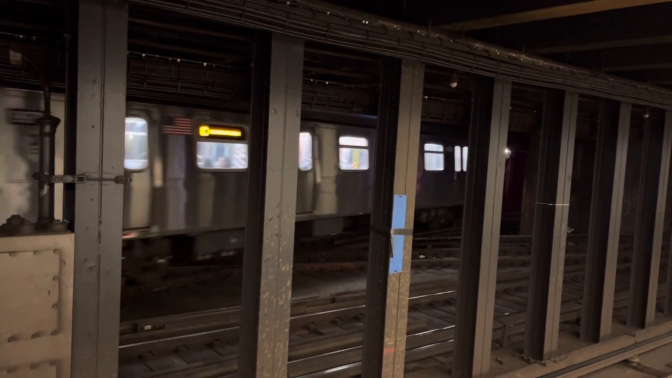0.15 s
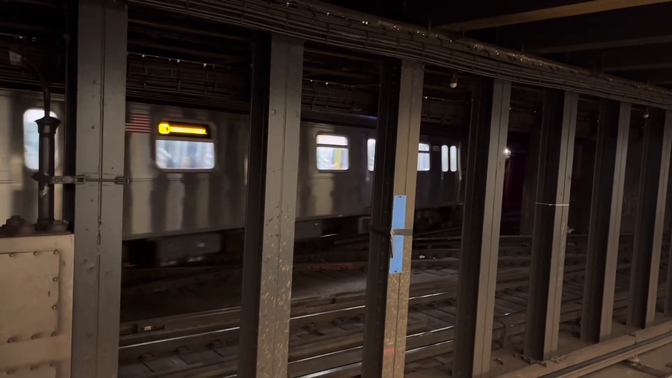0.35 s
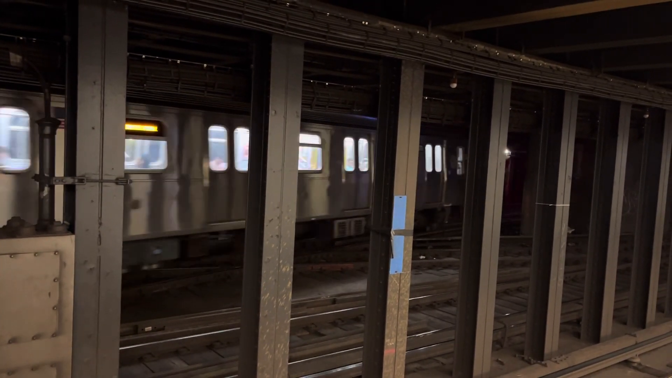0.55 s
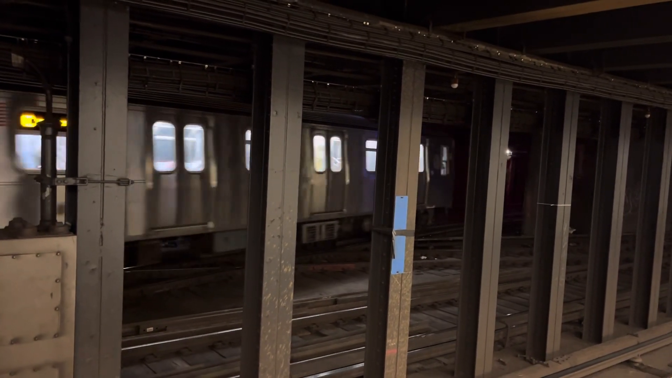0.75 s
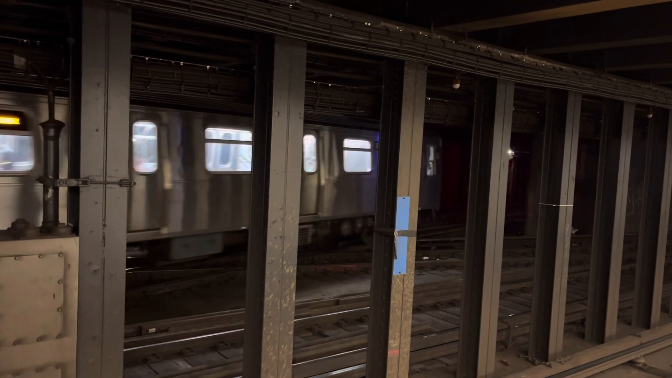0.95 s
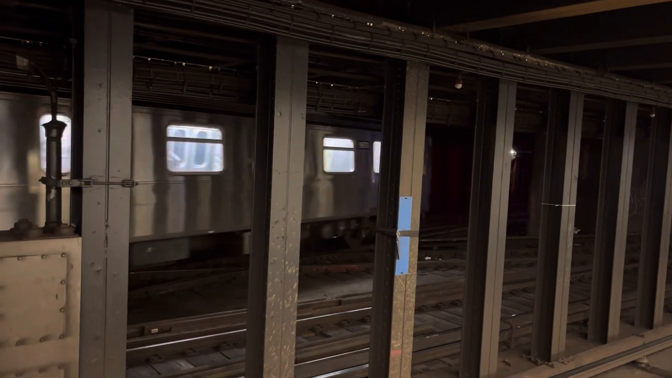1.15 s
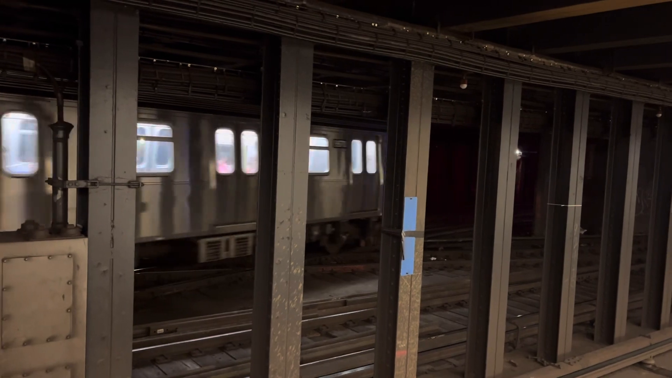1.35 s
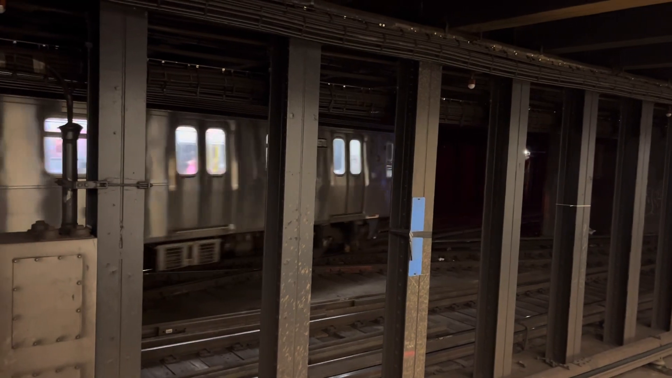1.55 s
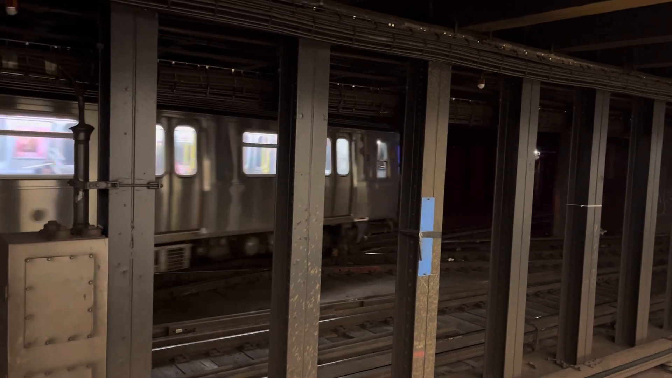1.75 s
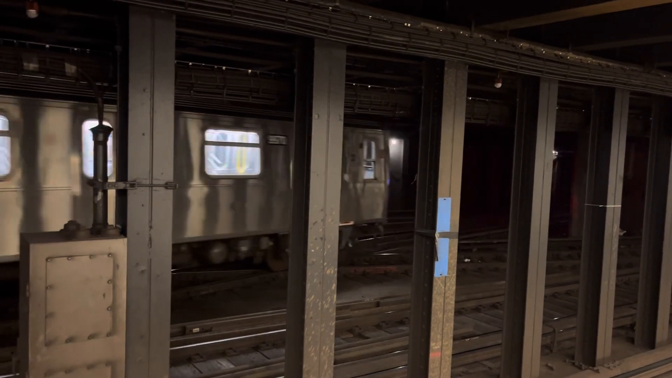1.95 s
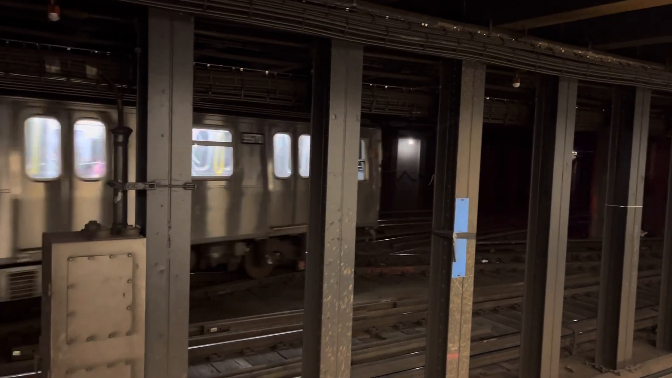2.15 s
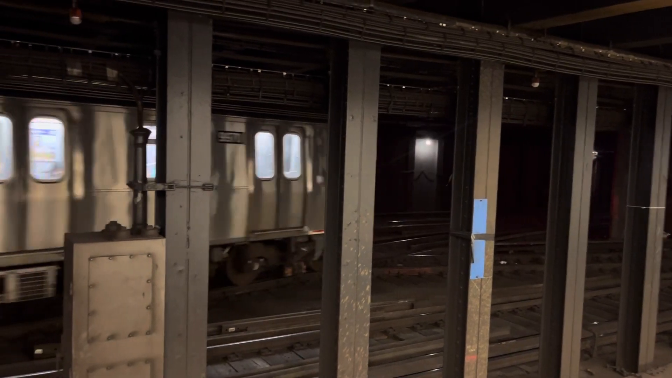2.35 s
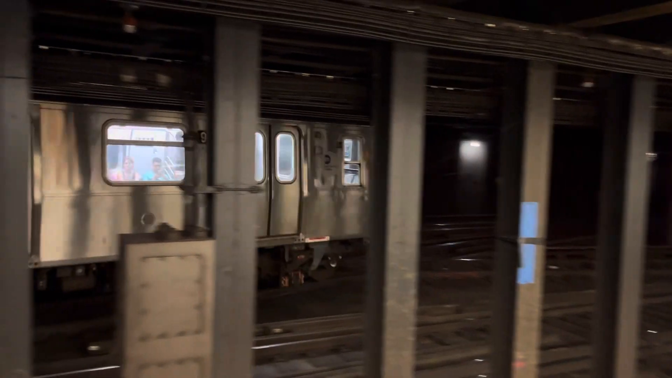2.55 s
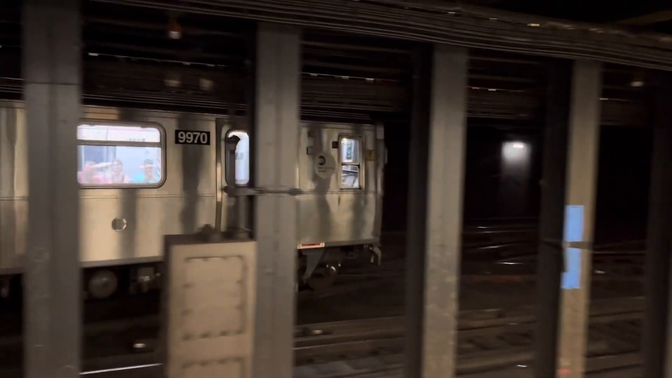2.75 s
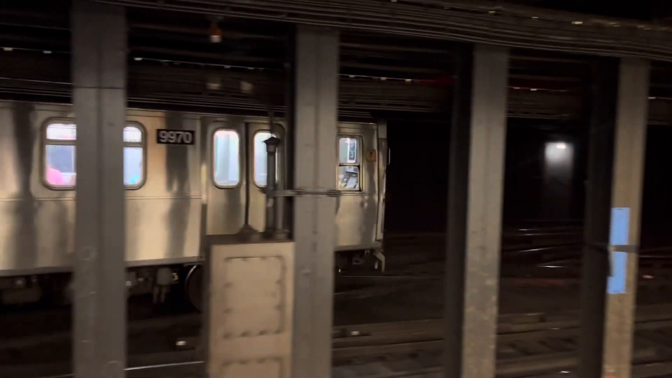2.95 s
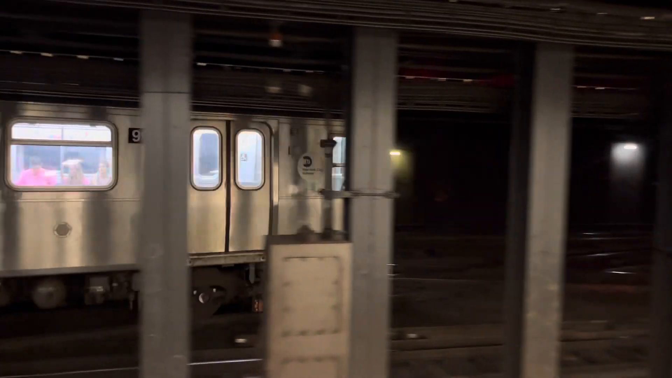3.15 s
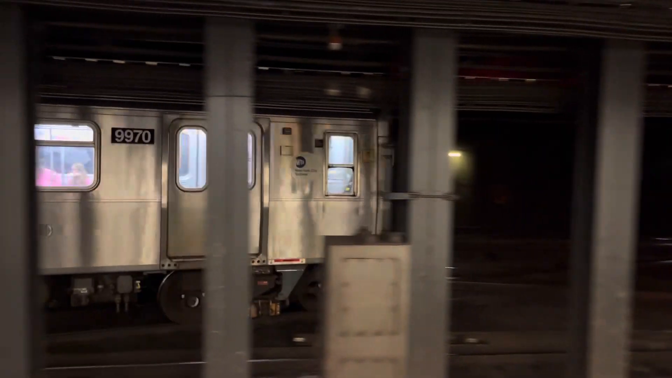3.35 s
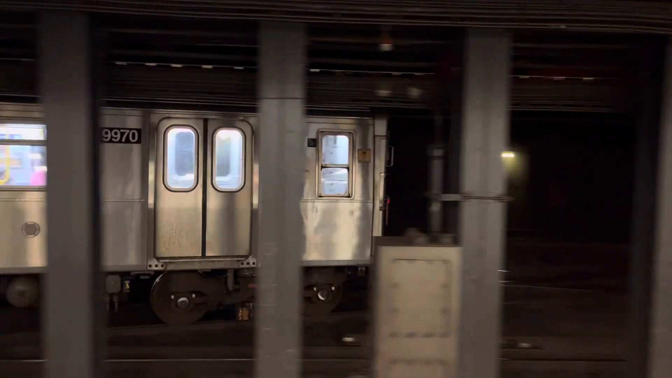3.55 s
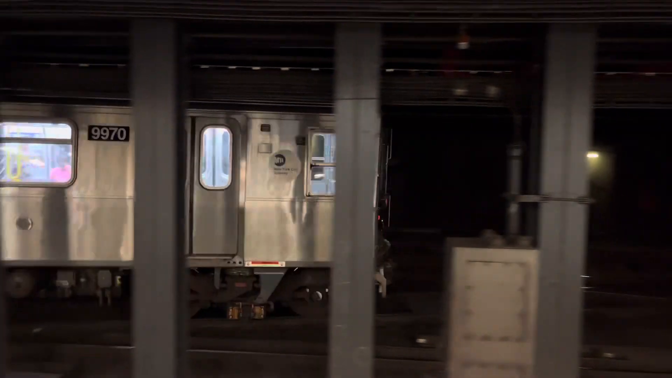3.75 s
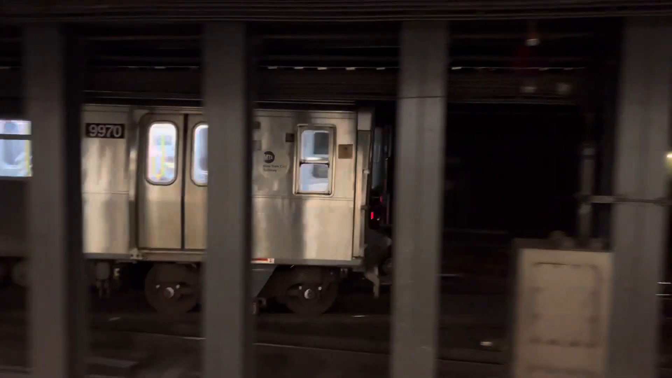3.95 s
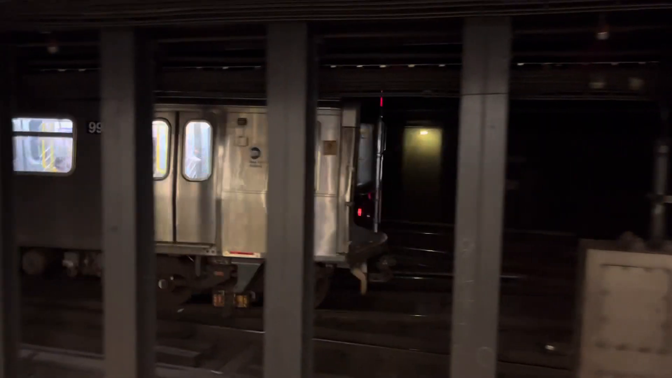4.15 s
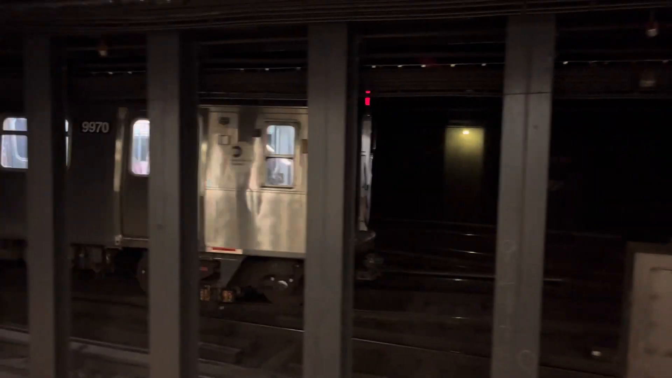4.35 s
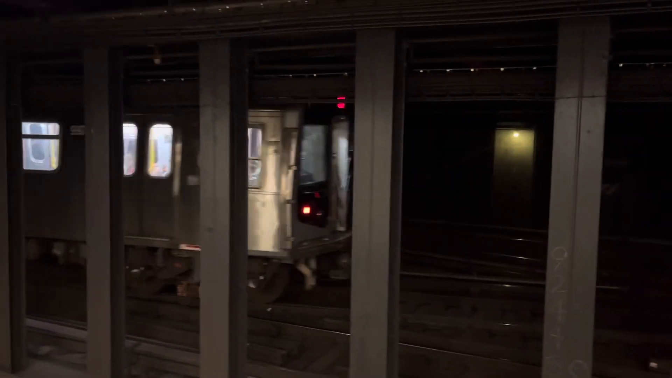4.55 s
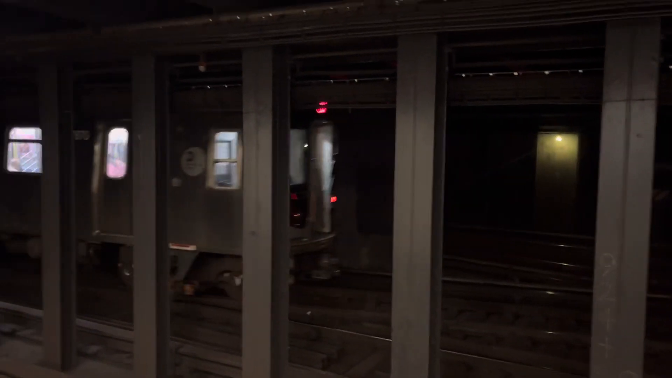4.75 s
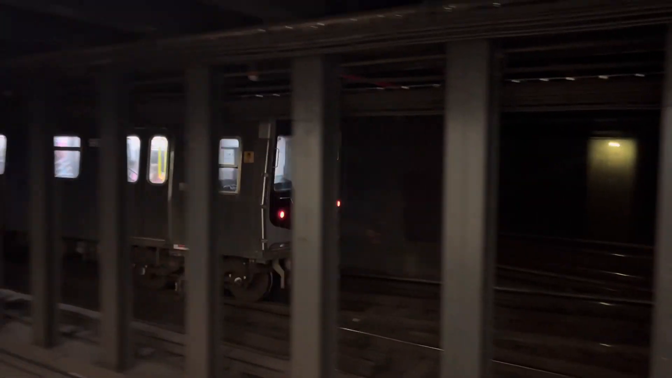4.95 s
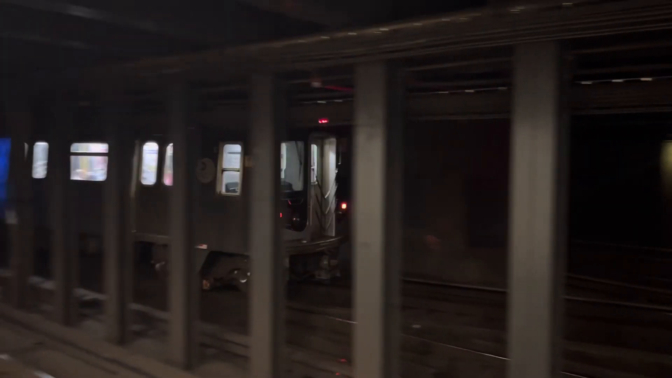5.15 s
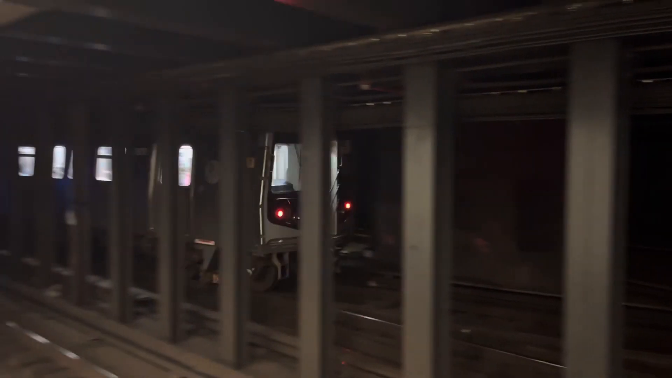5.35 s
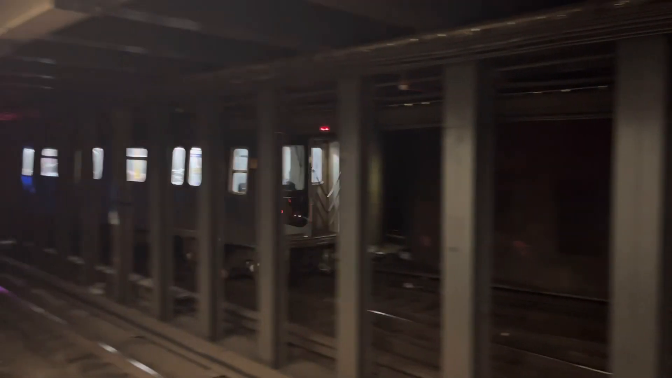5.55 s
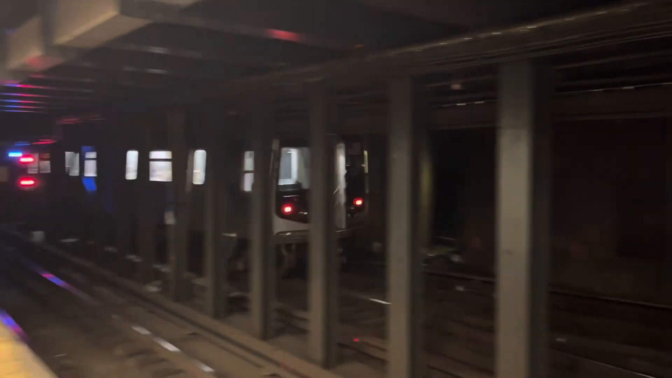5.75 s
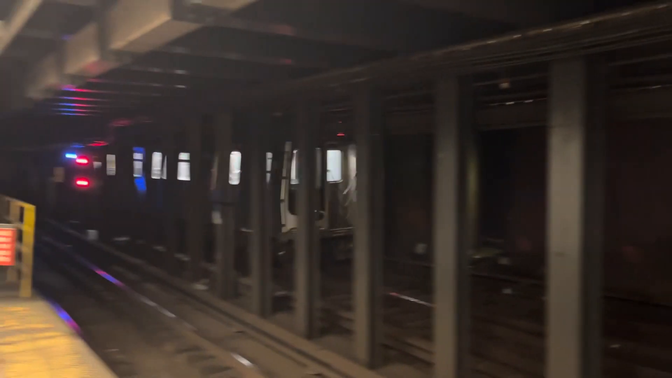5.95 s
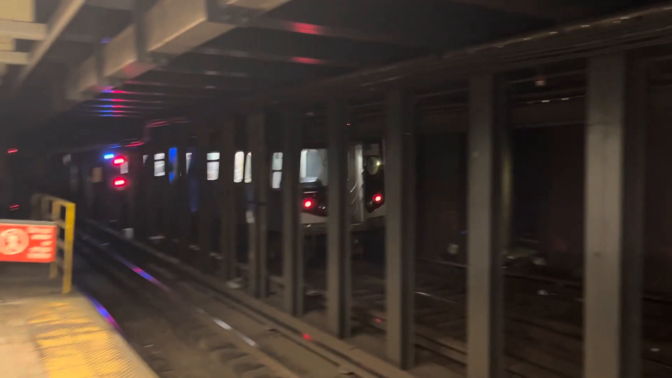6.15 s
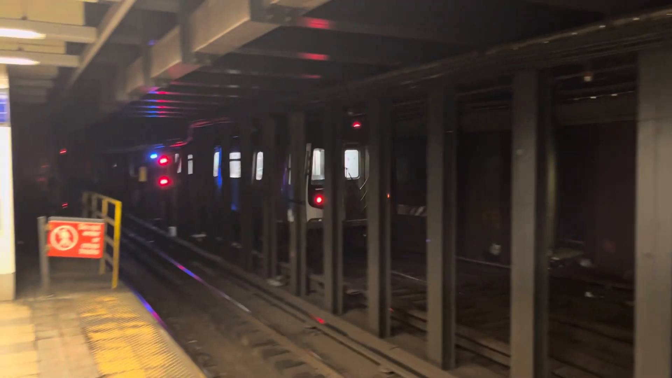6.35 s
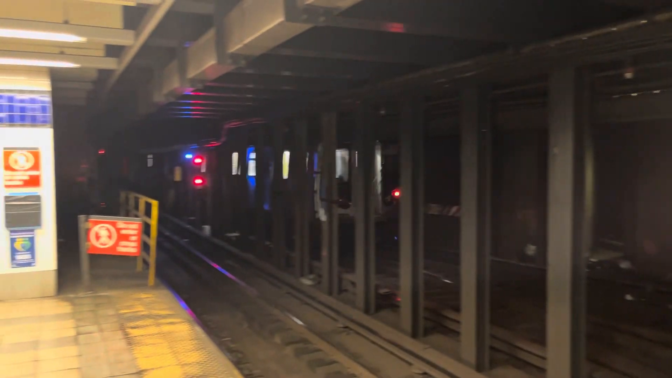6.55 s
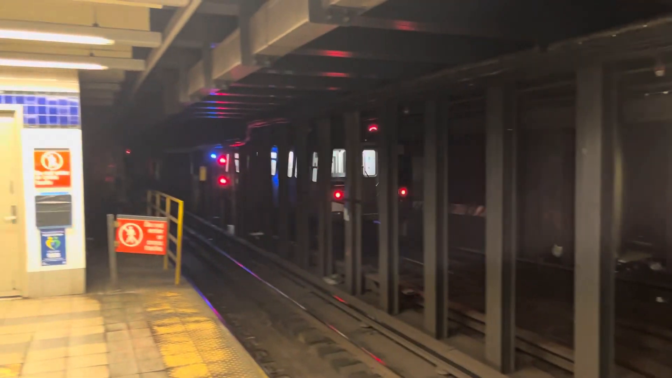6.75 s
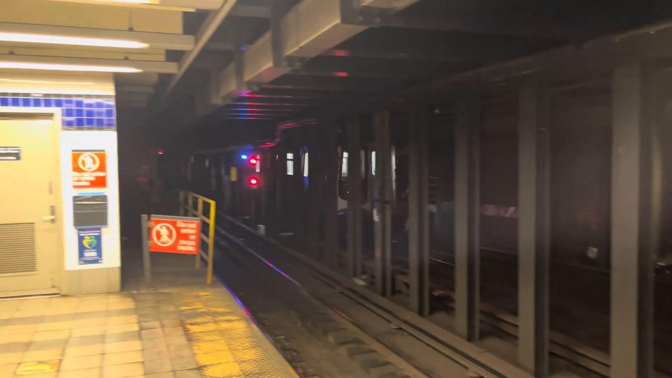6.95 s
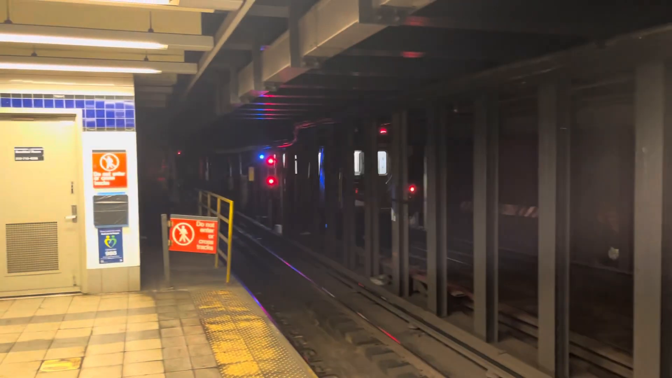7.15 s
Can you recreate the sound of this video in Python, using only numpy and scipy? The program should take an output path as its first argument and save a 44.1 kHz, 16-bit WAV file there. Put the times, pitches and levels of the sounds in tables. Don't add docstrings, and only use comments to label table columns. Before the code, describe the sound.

A subway train is already rolling by at close range in a reverberant, low concrete station, heard through a phone's two microphones. From 0 to 1.3 s, irregular steel clacks and low thuds hit rail joints every fifth of a second or so, over ground rumble, hollow car roar and rough rail hiss. A strong bang lands at 1.4 s, the heaviest at 1.9 s, with more at 2.3-2.4 s and 2.8 s; the car body booms, rims ring brightly and flanges squeal thinly. The roar swells around 2-2.5 s, with unsteady motor hum and a faint high fan whistle. After a thinner stretch near 3.3 s, smaller clacks cluster at 3.6-4.2 s with piercing short squeals. Then the blows spread out and weaken, apart from a firmer clack near 6.45 s, leaving fading roar, hiss and tunnel echo until about 7.2 s.

```python
import sys
import numpy as np
from scipy import signal
from scipy.fft import rfft, irfft, next_fast_len
from scipy.io import wavfile
from scipy.ndimage import uniform_filter1d

SR = 44100
rng = np.random.default_rng(int(sys.argv[2]) if len(sys.argv) > 2 else 0)


def convert_level_to_amplitude(level_db):
    exponent = np.asarray(level_db, float) / 20
    return 10 ** exponent


def generate_wav(sig):
    pcm = np.round(np.clip(np.atleast_2d(sig).T, -1, 1) * 32767).astype(np.int16)
    wavfile.write(sys.argv[1], SR, pcm)


N = 317961

# start_s, level_db, lean_db
MOTOR_HUM = [(0, -48, 5), (.5, -38, 3.5), (1.1, -35.5, -5), (1.8, -43, 10), (2.4, -26, -25), (2.8, -48, 11),
             (3.2, -33, -3), (4.3, -33, -15), (4.6, -41, 4.5), (5.8, -53, 16.5), (6.15, -40, -5),
             (6.3, -43.5, 10.5), (6.6, -44, -1), (6.9, -42, 6.5), (7.21, -37, 1.5)]
# start_s, pitch_hz, level_db
FAN_WHISTLE = [(0.0, 2860, -43), (0.74, 2852, -45.5), (1.951, 2820, -43.5), (2.45, 2770, -43),
               (2.65, 2800, -49), (3.0, 2846, -46), (5.02, 2825, -47.5), (5.8, 2817, -45.5),
               (7.21, 2830, -48.5)]
# full_swell_s, fade_s, pitch_hz, level_db
RIM_RINGS = [(0.25, 0.2, 7950, -53), (0.33, 0.1, 7320, -50), (0.32, 0.05, 7190, -50),
             (0.61, 0.12, 8940, -50), (1.01, 0.05, 5020, -52), (1.55, 0.06, 8940, -49),
             (2.01, 0.05, 8940, -41), (2.05, 0.08, 5710, -40), (2.26, 0.05, 7900, -54),
             (2.39, 0.1, 11520, -52), (2.4, 0.05, 5710, -40), (2.44, 0.29, 7920, -45),
             (2.49, 0.13, 4010, -38), (2.51, 0.08, 10030, -55), (2.91, 0.16, 7920, -51),
             (2.98, 0.08, 5680, -46), (3.65, 0.05, 6010, -53), (4.5, 0.1, 8960, -54),
             (3.91, 0.16, 9370, -44), (3.92, 0.05, 6180, -44), (3.88, 0.05, 5210, -51),
             (3.91, 0.08, 6760, -53), (3.93, 0.08, 10900, -56), (3.93, 0.14, 8230, -55),
             (4.16, 0.15, 8940, -45), (4.18, 0.15, 12340, -56), (4.19, 0.21, 7710, -44),
             (4.19, 0.05, 9110, -52), (4.56, 0.1, 6030, -53), (6.49, 0.09, 5230, -55)]
# full_swell_s, fade_s, pitch_hz, level_db
BODY_BOOMS = [
    (0.4, 0.074, 215.4, -29),
    (2.02, 0.081, 190.3, -24),
    (2.9, 0.08, 204.5, -27.5),
    (5.72, 0.05, 200, -32),
]
# full_swell_s, swell_s, fade_s, pitch_hz, level_db
FLANGE_SQUEALS = [(1.13, .21, .06, 8940, -54), (1.365, .07, .04, 4230, -41), (1.98, .19, .06, 7210, -44),
                  (2.03, .08, .3, 4020, -46), (3.9, .22, .14, 7320, -44), (3.9, .16, .07, 10530, -56),
                  (3.98, .06, .12, 3830, -42), (4.21, .07, .26, 3875, -39), (4.14, .03, .1, 4335, -42),
                  (4.26, .07, .06, 4335, -37.5), (2.9, .2, .2, 4040, -47), (5.56, .04, .15, 3620, -46),
                  (6.23, .04, .1, 3720, -53), (7.0, .1, .4, 4250, -51.5)]
# pitch_hz, width_hz, below_clack_db
WHEEL_MODES = [(4015, 60, -29), (5340, 50, -36), (5710, 60, -37), (6350, 60, -40), (7210, 50, -38),
               (7920, 50, -37), (8940, 50, -36), (10850, 50, -47), (14370, 40, -39)]
# start_s, clack_db, thud_db, brightness_db_per_octave
JOINT_BLOWS = [(0.14, -19, -36, 0.5), (0.358, -30, -18, 1.2), (0.563, -23.5, -14.5, 1.1),
               (0.779, -31.5, -21, 2.5), (0.969, -33, -33, 4.5), (1.109, -27, -39, -0.2),
               (1.259, -35.5, -29, 4), (1.43, -16.5, -11, 0.6), (1.736, -23.5, -41, 2),
               (1.939, -13.5, -10.5, 0.5), (2.173, -29, -14, -2), (2.336, -15, -30, 1),
               (2.439, -21, -9.5, 1.1), (2.755, -29, -35, -1), (2.832, -19.5, -13.5, -0.7),
               (3.289, -45, -37, 5.5), (3.569, -32.5, -27, 2), (3.704, -25.5, -27, 2.1),
               (3.844, -33.5, -19, 6), (3.914, -28, -21, 3.5), (4.107, -24, -26, 0.5),
               (4.124, -20.5, -36, 0.5), (4.479, -34, -19, 2), (4.635, -30.5, -32, -3.3),
               (4.844, -29, -34, -0.7), (5.248, -28, -16.5, -0.5), (5.529, -35.5, -33, 3.5),
               (5.791, -38, -27, 1), (6.199, -31.5, -42, -3.5), (6.453, -24.5, -13, -3)]
# freq_hz, density_db
CLACK_COLOUR = [(200, -8), (500, 4), (1000, -0.5), (1700, -7.5), (2500, -9.5), (4000, -12), (6000, -19.5),
                (7500, -21.5), (9000, -18), (11000, -36), (13000, -27), (14500, -63), (16500, -55)]
# freq_hz, density_db
THUD_COLOUR = [(30, -40), (60, -21), (120, 5), (190, -4), (260, -6.5), (340, 3), (430, -24), (500, -7),
               (800, -12.5), (1500, -45)]
# freq_hz, fill_s
ECHO_FILL = [(100, 0.064), (500, 0.012), (2000, 0.0014), (10000, 0.0017)]
# freq_hz, t60_s
ECHO_DECAY = [(100, 0.91), (400, 0.63), (1500, 1.06), (5000, 1.28), (12000, 0.54)]
# start_s, roar_db
ROLLING_LEVEL = [(0.0, -25), (0.12, -28), (0.38, -25.5), (0.65, -29), (1.06, -33), (1.14, -31), (1.58, -26),
                 (1.93, -25), (2.05, -21), (2.31, -28), (2.45, -19.5), (2.67, -25.5), (2.97, -25),
                 (3.41, -32), (4.18, -29), (4.72, -33), (5.1, -30.5), (7.21, -35.5)]
# centre_s, rumble_db, half_length_s
GROUND_SHAKES = [(0.293, -26, 0.11), (0.584, -28, 0.07), (1.145, -29, 0.14), (1.6, -27.5, 0.18),
                 (2.1, -37, 0.2), (2.97, -32, 0.11), (3.696, -30.5, 0.12), (3.977, -26.5, 0.14),
                 (4.25, -28, 0.17), (5.688, -41, 0.22), (6.247, -37.5, 0.12)]
# freq_hz, density_db
RUMBLE_COLOUR = [(20, -40), (35, -4.5), (55, 18), (90, 0), (140, -13), (220, 5), (400, -48.5)]
# freq_hz, density_db
ROAR_COLOUR = [(70, -7), (130, -2), (170, 2), (230, -1.5), (340, 1.5), (400, 0), (465, -4.5), (500, -10),
               (650, -13.5), (1000, -33), (2000, -71)]
# freq_hz, density_db
HISS_COLOUR = [(300, -7), (600, 3), (1000, -1), (1700, -6.5), (2500, -12), (4000, -15), (6000, -23),
               (7500, -28), (9000, -32.5), (11000, -37.5), (13000, -43), (14500, -54), (16500, -57)]
# freq_hz, spread_db
ROLLING_PATCHES = [(60, 0), (250, 1), (600, 1), (3000, 1.55)]
# freq_hz, spread_db
LOOSE_STEEL = [(1500, 1), (4000, 3), (7000, 4.5), (12000, 7)]
# freq_hz, likeness_0_to_1
PORT_LIKENESS = [(60, .99), (300, .8), (700, .33), (1050, .3), (1450, .08), (1700, .15), (1850, .75),
                 (2900, .67), (3400, .52), (4600, .57), (5200, .36), (6000, .6), (6900, .6), (7600, 1)]
# freq_hz, phase_rad
PORT_PHASE = [(60, 0), (300, -.3), (700, -1.3), (1200, -2), (1850, -.35), (2400, -.35), (3000, -1.1),
              (3700, -.55), (5100, -.45), (5600, .95), (6400, 1.15), (7300, 2.2),
              (7800, np.pi), (8650, np.pi), (9000, 3.45), (9700, 4.3), (10400, 5.4),
                   (11200, 2 * np.pi), (13000, 2 * np.pi), (13700, 7.9), (14600, 3 * np.pi)]
# freq_hz, level_db
LEFT_OVER_RIGHT = [(350, -1.1), (800, 1.8), (1100, 1.3), (1550, -2.3), (1900, 2.9), (2500, 2.3),
                   (4200, 5.6), (5500, 5), (6700, 1.4), (7700, 0)]


def evened(x):
    return x / np.sqrt(np.mean(x ** 2) + 1e-20)


def read(points, hz):
    table_hz, values = np.transpose(points)
    return np.interp(np.log(hz + 1), np.log(table_hz + 1), values)


def share(colour, hz):
    power = convert_level_to_amplitude(2 * read(colour, hz))
    return power / power.mean()


def diffuse(power, size):
    re, im = rng.standard_normal((power.shape[1], power.shape[0], 2, 2)).T
    spectra = (re + 1j * im) * np.sqrt(power)
    noise = signal.istft(spectra, nperseg=size, noverlap=size * 3 // 4)[1][:, :N]
    return noise * np.sqrt(16 / 3) / np.sqrt(size)


def narrow(hz, width_hz, count):
    r = np.exp(-np.pi * width_hz / SR)
    re, im = rng.standard_normal((2, 2, count + 4000))
    slow = signal.lfilter([1], np.convolve([1, -r], [1, -r]), re + 1j * im)[:, 4000:]
    slow = slow * np.sqrt((1 - r * r) ** 3 / (1 + r * r))
    turns = np.cumsum(hz * np.ones(count)) / SR
    return (slow * np.exp(2j * np.pi * turns)).real


def jangle(hz, t, ring_s):
    frames = max(round(ring_s / t[1]), 1)
    swell = uniform_filter1d(rng.standard_normal((len(t), len(hz))), frames, 0)
    factor = convert_level_to_amplitude(2 * read(LOOSE_STEEL, hz) * evened(swell)).T
    return factor / factor.mean(1, keepdims=True)


def motor_and_fan():
    t = np.arange(N) / SR
    beats = [evened(uniform_filter1d(x, 4000)) for x in rng.standard_normal((7, N))]
    s, db, lean_db = np.transpose(MOTOR_HUM)
    steady = np.ones(len(s))
    lines_db = [db, db + lean_db, -43.5 * steady, -45.5 * steady]
    turns = np.cumsum(113.4 + 0.65 * beats[0]) / SR
    hum = np.zeros(N)
    for k, (line_db, beat) in enumerate(zip(lines_db, beats[3:]), 1):
        level = convert_level_to_amplitude(np.interp(t, s, line_db) + 1.5 * beat)
        hum += level * np.sqrt(2) * np.sin(2 * np.pi * k * turns)
    s, hz, db = np.transpose(FAN_WHISTLE)
    level = convert_level_to_amplitude(np.interp(t, s, db) + 1.5 + 1.8 * beats[1])
    centre_hz = np.interp(t, s, hz) + 2 + 14 * beats[2]
    whistle = level * narrow(centre_hz, width_hz=150, count=N)
    return hum * [[1], [.3]] + whistle


def rings_and_squeals():
    out = np.zeros((2, N))
    swell_s, ring_width_hz, squeal_width_hz = 0.065, 32, 55
    held = 1.2
    tones = [(s, swell_s, fade, hz, db, ring_width_hz) for s, fade, hz, db in [*RIM_RINGS, *BODY_BOOMS]]
    tones += [(*squeal, squeal_width_hz) for squeal in FLANGE_SQUEALS]
    for s, swell, fade, hz, db, width_hz in tones:
        t = np.arange(0, swell + 3 * fade, 1 / SR)
        shape = np.minimum(t / swell, 1) * convert_level_to_amplitude(-10 * np.maximum(t - swell, 0) / fade)
        wavering = np.array([evened(x) for x in narrow(hz, width_hz, count=len(t))])
        steady = np.sqrt(2) * np.sin(2 * np.pi * (hz * t + rng.random((2, 1))))
        tone = evened(wavering + held * steady)
        part = out[:, round((s - swell) * SR):][:, :len(t)]
        part += (convert_level_to_amplitude(db - 1) * shape * tone)[:, :part.shape[1]]
    return out


def wheel_modes():
    t = np.arange(0, N, 64) / SR
    blows = np.array(JOINT_BLOWS)
    since = np.maximum(t - blows[:, :1], 0)
    sing = (1 - np.exp(-since / .05)) * convert_level_to_amplitude(-120 * since / 1.8)
    blow_db = blows[:, 1:2] + 2.5 * rng.standard_normal((len(JOINT_BLOWS), len(WHEEL_MODES)))
    levels = np.sqrt(convert_level_to_amplitude(2 * blow_db).T @ sing)
    out = np.zeros((2, N))
    for level, (hz, width_hz, db) in zip(levels, WHEEL_MODES):
        out += convert_level_to_amplitude(db) * np.repeat(level, 64)[:N] * narrow(hz, width_hz, count=N)
    return out


def direct_cracks():
    out, t = np.zeros((2, N)), np.arange(2000) / SR
    crack_db, crack_s = -11, 0.009
    bright = signal.butter(2, [450, 5500], "band", fs=SR)
    for s, clack_db, _, bright_db in JOINT_BLOWS:
        burst = signal.lfilter(*bright, rng.standard_normal((2, len(t)))) * np.exp(-t / crack_s)
        out[:, round(s * SR):][:, :len(t)] += convert_level_to_amplitude(clack_db + crack_db + bright_db) * burst
    return out


def joint_clacks():
    hz, t = np.fft.rfftfreq(512, 1 / SR), np.arange(N // 128 + 5) * 128 / SR
    fill_s = np.maximum(read(ECHO_FILL, hz), 1e-3)[:, None]
    t60_s = read(ECHO_DECAY, hz)[:, None]
    soft_s = 0.0019
    power = np.zeros((len(hz), len(t)))
    for s, clack_db, thud_db, bright_db in JOINT_BLOWS:
        rattle_s = 0.1 - 0.014 * s
        first = int(s * SR / 128) + 1
        since = t[first:first + 500] - s
        tilt_db = bright_db * np.log2((hz + 1) / 2000)
        clack = share(CLACK_COLOUR, hz) * convert_level_to_amplitude(2 * (clack_db - 10.0 + tilt_db))
        thud = share(THUD_COLOUR, hz) * convert_level_to_amplitude(2 * (thud_db - 15.5))
        build_up = 1 - np.exp(-since / (fill_s + soft_s))
        die_away = convert_level_to_amplitude(-120 * np.maximum(since - rattle_s, 0) / t60_s)
        power[:, first:first + 500] += (clack + thud)[:, None] * build_up * die_away
    return diffuse(power * jangle(hz, t, ring_s=0.083), size=512) + direct_cracks()


def rolling():
    hz, t = np.fft.rfftfreq(1024, 1 / SR), np.arange(N // 256 + 5) * 256 / SR
    roar_db = np.interp(t, *np.transpose(ROLLING_LEVEL))
    rumble = convert_level_to_amplitude(2 * -41) * np.ones(len(t))
    for s, db, half_s in GROUND_SHAKES:
        rumble += convert_level_to_amplitude(2 * db) * np.exp(-((t - s) / half_s) ** 2)
    hiss_db = -33 + 0.65 * (roar_db + 27.5)
    power = np.outer(share(RUMBLE_COLOUR, hz), rumble)
    power += np.outer(share(ROAR_COLOUR, hz), convert_level_to_amplitude(2 * roar_db))
    power += np.outer(share(HISS_COLOUR, hz), convert_level_to_amplitude(2 * hiss_db))
    chance = rng.standard_normal((len(t), len(hz)))
    patches = evened(uniform_filter1d(uniform_filter1d(chance, 14, 0), 4, 1))
    power *= convert_level_to_amplitude(2 * (read(ROLLING_PATCHES, hz) * patches).T)
    return diffuse(power * jangle(hz, t, ring_s=0.091), size=1024)


def scene():
    return motor_and_fan() + rings_and_squeals() + wheel_modes() + joint_clacks() + rolling()


def top_cut(x):
    return signal.sosfilt(signal.butter(12, 15600, fs=SR, output="sos"), x)


def record(dry):
    size = next_fast_len(N)
    hz = np.fft.rfftfreq(size, 1 / SR)
    same = read(PORT_LIKENESS, hz)
    phase = read(PORT_PHASE, hz)
    left, other = rfft(dry, size) / np.sqrt(1 + (50 / (hz + 1)) ** 9)
    right = same * np.exp(1j * phase) * left + np.sqrt(1 - same ** 2) * other
    right = right * convert_level_to_amplitude(-read(LEFT_OVER_RIGHT, hz))
    ports = irfft(np.array([left, right]), size)[:, :N]
    return top_cut(ports)


dry = scene()
out = record(dry)
generate_wav(out)
```